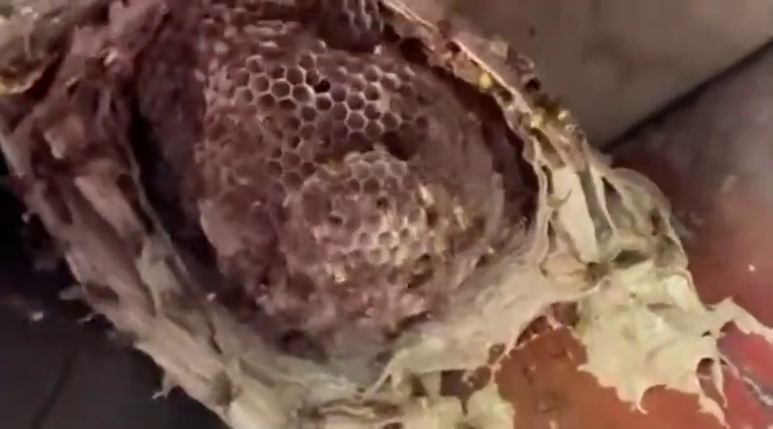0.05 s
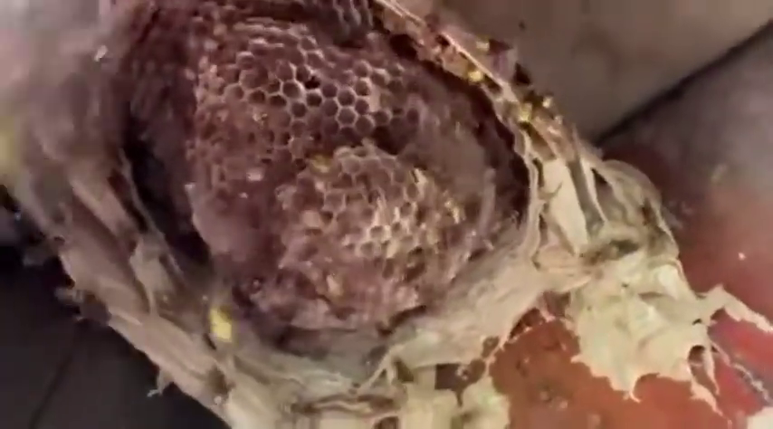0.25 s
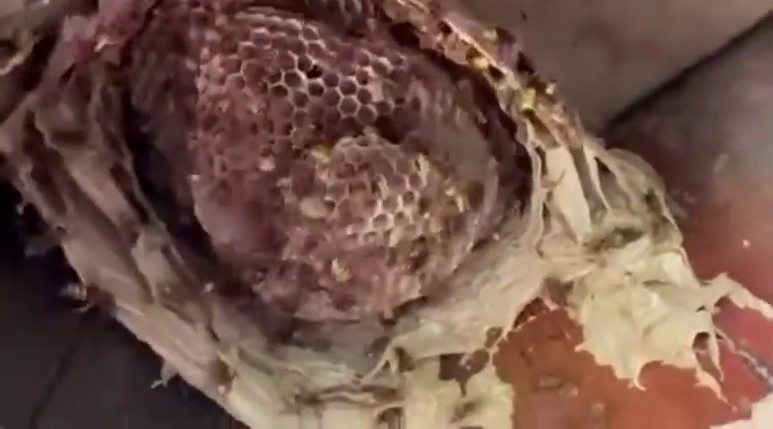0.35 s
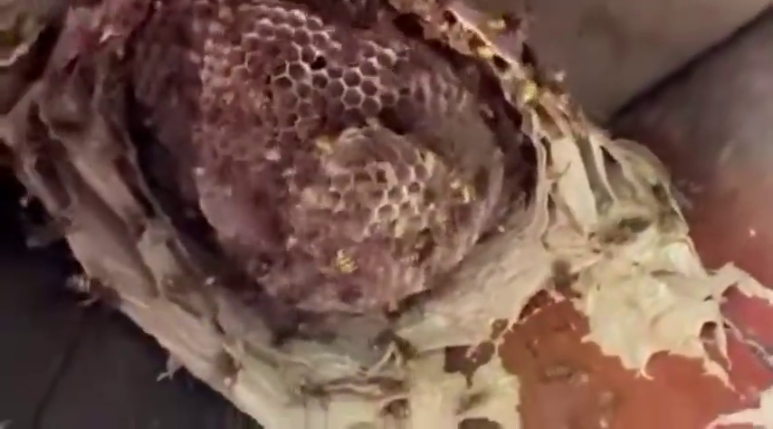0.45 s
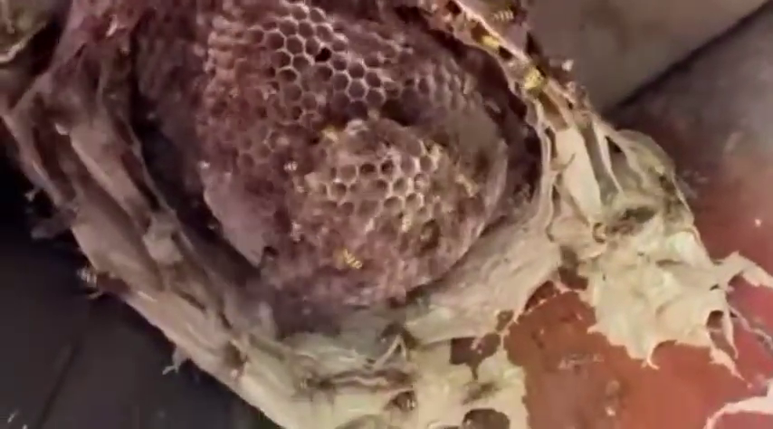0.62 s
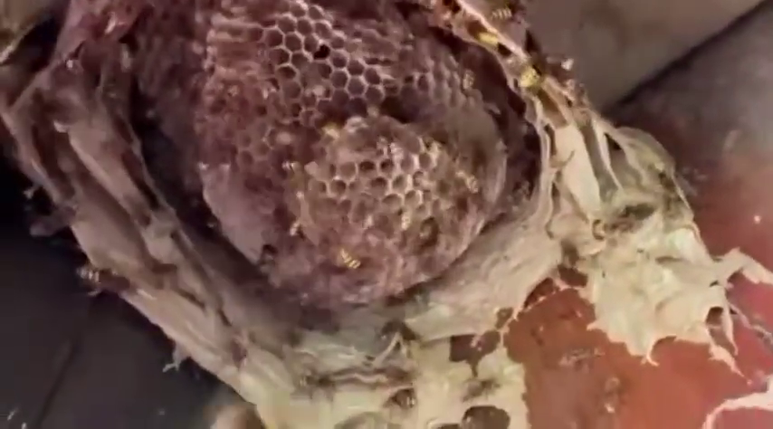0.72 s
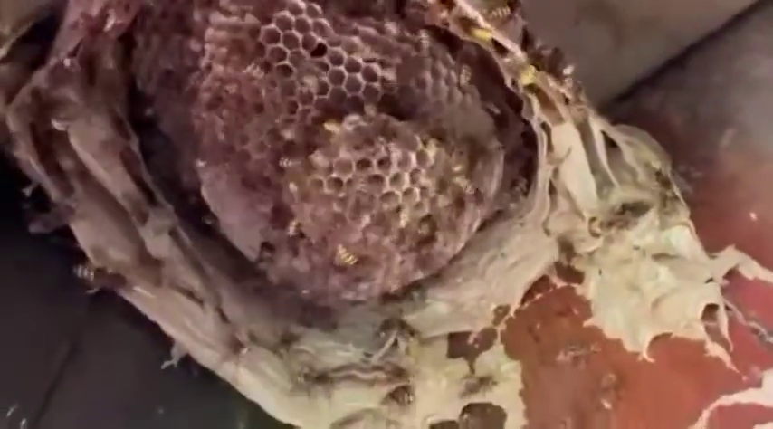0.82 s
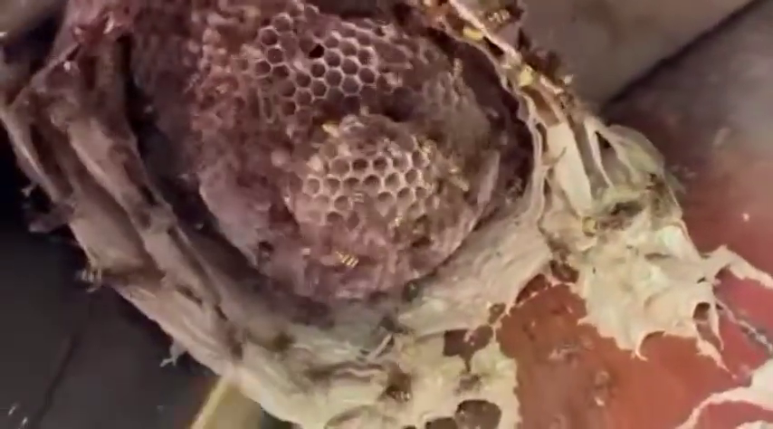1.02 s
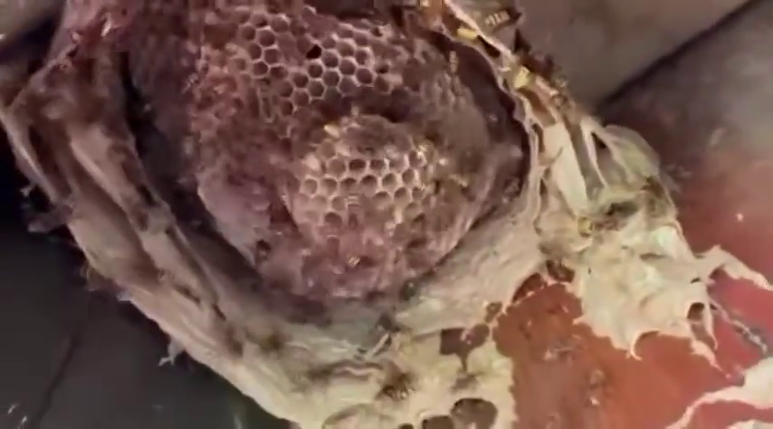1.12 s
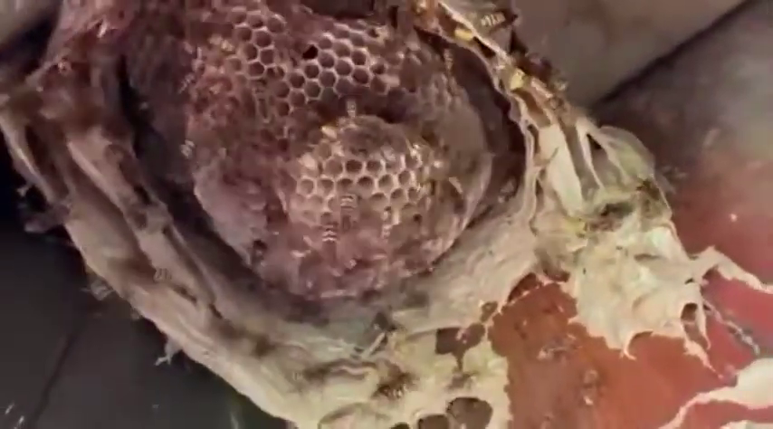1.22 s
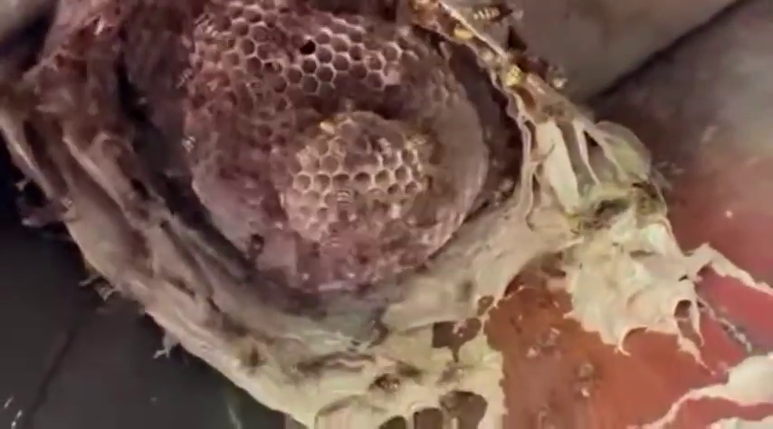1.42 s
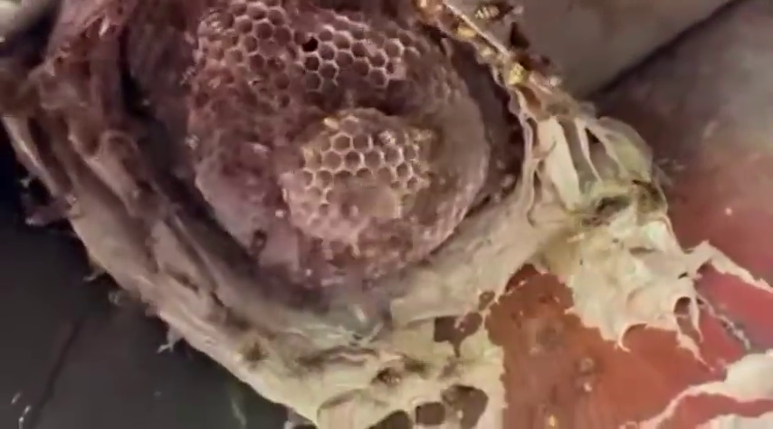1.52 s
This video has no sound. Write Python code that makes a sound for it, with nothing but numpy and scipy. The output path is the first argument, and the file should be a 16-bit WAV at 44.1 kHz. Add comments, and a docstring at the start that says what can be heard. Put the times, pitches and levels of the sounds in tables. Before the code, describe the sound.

Hornets buzz at an opened paper nest outdoors. One flies right up to the microphone, its wings buffeting it with low puffs, then leaves. Others pass farther off while legs scratch and tick on the comb over a steady hiss.

```python
"""Outdoors at an opened paper nest of hornets, on a stereo pair of microphones.
From the start the colony drones over a steady hiss, a few hornets pass farther off, and legs and jaws
scratch and tick on the paper comb. At 0.2 s one flies right up to the microphones, buzzes there for
half a second and buffets them with the wash of its wings. From 0.9 s the distant passes return,
and the drone and the scratching build again toward the end."""
import sys
import numpy as np
from scipy import signal
from scipy.fft import rfft, irfft
from scipy.io import wavfile
from scipy.ndimage import uniform_filter1d

SR = 44100
rng = np.random.default_rng(int(sys.argv[2]) if len(sys.argv) > 2 else 0)


def store_pcm(level_fs):
    """Save levels as 16-bit WAV."""
    pcm = np.round(np.clip(level_fs, -1, 1) * 32767).astype(np.int16)
    wavfile.write(sys.argv[1], SR, np.atleast_2d(pcm).T)


N = 68355
T, HZ = np.arange(N) / SR, np.fft.rfftfreq(N, 1 / SR)

# open-air hiss (frequency [Hz], relative level [dB])
AIR_SPECTRUM = [(20, 3), (50, 37), (100, -45), (300, 21), (1000, 27), (2000, 0), (4000, 3), (7000, -6),
                (9200, 6.5), (10300, -20), (11500, 21.5), (13000, -51)]
# likeness of the hiss at the two microphones (frequency [Hz], correlation [clipped to -1..1])
AIR_LIKENESS = [(50, 0.62), (300, -0.21), (1000, -0.41), (2500, -0.079), (5000, 0.65), (8000, 0.13),
                (10300, 0.78), (11300, -1.2)]
# drone of the whole colony (time [s], level [dB])
DRONE_LEVEL = [(0, -55), (.1, -46), (.2, -43), (.3, -43), (.6, -43), (.81, -41), (.9, -51.5), (1.1, -50),
               (1.28, -47), (1.34, -45.5), (1.42, -40), (1.55, -43)]
# its colour (frequency [Hz], relative level [dB])
DRONE_SPECTRUM = [(30, -41), (90, -2), (130, 6.5), (200, -9.5), (270, 0), (420, -1.5), (650, -2.5),
                  (1000, -8), (1600, -27), (3000, -24), (8000, -79)]
# handling rumble and stirred air (time [s], level [dB])
RUMBLE_LEVEL = [(0, -51), (.05, -42.5), (.125, -52), (.17, -68), (.22, -44), (.26, -28.5), (.62, -37),
                (.7, -53), (.76, -55.5), (.81, -43), (.88, -70), (1.2, -81), (1.3, -50), (1.55, -83)]
# its colour (frequency [Hz], relative level [dB])
RUMBLE_SPECTRUM = [(15, -7), (30, -7), (50, 5), (90, -11), (180, -4), (400, -2.5), (1500, -87)]
# dry crackle of the comb (time [s], level [dB])
CRACKLE_LEVEL = [(0, -53), (.042, -46.5), (.07, -57), (.1, -51.5), (.13, -56), (.22, -53.5), (.252, -47.5),
                 (.28, -53), (.345, -56), (.38, -48), (.42, -54.5), (.46, -51), (.515, -57), (.545, -50),
                 (.59, -54.5), (.76, -53), (.82, -45.5), (.86, -48.5), (1.05, -54), (1.095, -49),
                 (1.13, -55.5), (1.2, -49), (1.28, -49.5), (1.34, -51), (1.39, -47.5), (1.43, -47.5),
                 (1.47, -43.5), (1.51, -49), (1.55, -44.5)]
# colour of the paper (frequency [Hz], relative level [dB])
PAPER_SPECTRUM = [(300, -91), (1000, 5.5), (2000, 2.5), (3500, -0.5), (5000, 0.5), (7000, 1), (9000, 3.5),
                  (10300, -8.5), (11500, -1), (13000, -15)]
# single bright scrapes across the paper (time [s], half-length [s], level [dB])
SCRAPES = [(0.692, 0.03, -51), (0.77, 0.026, -55), (0.9, 0.023, -45), (1.01, 0.065, -53.5),
           (1.291, 0.015, -43.5)]
# their colour (frequency [Hz], relative level [dB])
SCRAPE_SPECTRUM = [(1000, -2), (3600, -6), (5000, -1), (6700, 4.5), (9000, -2.5), (10300, -13),
                   (11500, -32), (13000, -2)]
# hornets farther off (time when closest [s], half-length [s], wingbeat [Hz], wingbeat level [dB],
# octave re wingbeat [dB], overtones re wingbeat [dB], favoured overtone [Hz], left microphone lead [ms])
FAR_PASSES = [(0.026, 0.022, 124, -60.5, 18, 11, 372, 1), (0.09, 0.024, 138, -57.5, 15.5, 14.5, 436, -0.42),
              (0.129, 0.0089, 156, -42.5, 2.5, -8, 410, 0.76),
              (0.15, 0.017, 120, -51.5, 11, -4, 385, -0.66), (0.907, 0.032, 131, -54.5, 4.5, 1, 410, 0.012),
              (0.973, .016, 140, -51, -4, -8, 635, -0.21),
              (1.056, 0.034, 128, -52.5, -14.5, 0.5, 380, -0.27),
              (1.114, .018, 142, -54.5, 1, -7, 610, 0.32), (1.157, 0.013, 131, -44.5, -11, -7, 656, 0.39),
              (1.202, 0.012, 127, -53.5, 4, 8.5, 375, 0.21), (1.25, 0.015, 123, -55, 6.5, 9.5, 370, -0.11),
              (1.284, 0.01, 125, -38.5, -2.5, 0.5, 507, 0.14),
              (1.394, 0.024, 116, -42.5, -9, -3, 620, -0.15), (1.457, 0.016, 116, -58, -4, 7, 610, -0.4),
              (1.518, 0.026, 114, -55, 0, 4, 650, 0.002)]
# their overtones (frequency [Hz], relative level [dB])
FAR_SPECTRUM = [(380, 1), (500, 0), (640, 0.5), (800, -15), (1050, -5), (1500, -29), (3000, -18),
                (5000, -46)]
# ticks of the paper (time [s], level [dB], left over right [dB], added tilt [dB per octave])
PAPER_TICKS = [(0.041, -40.5, 2, 5.5), (.0955, -33.5, -1, 9), (0.2442, -25.5, -2.5, -2),
               (.2538, -33.5, -7, -1), (0.399, -41, 3, -1), (0.406, -34, 2, 2), (0.4137, -42, -5, -1),
               (.4182, -37, -3, 7), (0.4193, -33.5, -7, 1.5), (0.4281, -35.5, 8, -5),
               (0.435, -36.5, -3, -3), (0.7903, -39, -11, 4), (0.8151, -37, -2, 0), (0.8208, -36, -4, -3),
               (0.8675, -39, -1, 3), (1.0842, -37, 0, 0.5), (1.2425, -31, -1.5, 2), (1.2503, -36, -3, 1),
               (1.3725, -37.5, -8, 4)]
# near hornet's pitch (time [s], wingbeat [Hz])
NEAR_WINGBEAT = [(.18, 151), (.238, 151), (.3, 144.5), (.335, 148.3), (.368, 148), (.4, 145), (.46, 144),
                 (.49, 147.5), (.566, 149), (.63, 146), (.7, 142.5), (.8, 142)]
# its loudness (time [s], wingbeat level [dB], octave level [dB], overtone level [dB])
NEAR_LEVELS = [(.16, -65, -62, -64), (.2, -37, -37, -42), (.222, -47, -33, -44), (.245, -30, -22, -28.5),
               (.285, -34, -26.5, -43), (.312, -44, -34, -40), (.345, -28, -25, -36),
               (.375, -43.5, -28.5, -45), (.415, -26.5, -26.5, -41.5), (.447, -67, -34.5, -43.5),
               (.468, -24.5, -21.5, -38), (.52, -26.5, -28.5, -36.5), (.565, -20.5, -24, -34.5),
               (.59, -37.5, -29, -41), (.655, -27, -39.5, -41), (.68, -37, -21.5, -33.5),
               (.702, -22.5, -14, -28.5), (.726, -48, -46, -50), (.775, -52, -36.5, -40.5),
               (.84, -68, -63, -81)]
# its overtones (frequency [Hz], relative level [dB])
NEAR_SPECTRUM = [(430, 1), (590, -4), (740, -4.5), (890, -14.5), (1040, -15.5), (1200, -15), (1500, -19.5),
                 (2500, -31), (5000, -44)]
# its bearing (time [s], left microphone lead [ms], left over right [dB])
NEAR_DIRECTION = [(.2, -0.45, 0.5), (.25, 0.062, -2.5), (.29, 0.0018, 5.5), (.33, -0.073, -2),
                  (.38, 0.075, 5), (.43, 0.11, 0.5), (.47, -0.15, -0.5), (.55, 0.041, 2),
                  (.63, 0.047, -0.5), (.68, 0.39, -3.5), (.71, 0.45, 1), (.79, 0.48, -0.5)]
# its heading favours one overtone (time [s], favoured overtone [Hz])
NEAR_HEADING = [(.2, 730), (.235, 447), (.3, 430), (.33, 580), (.36, 607), (.39, 425), (.575, 442),
                (.6, 590), (.645, 690), (.67, 557), (.71, 554), (.75, 704)]
# puffs of wing wash on the microphones (time [s], half-length [s], centre [Hz], level [dB])
WASH_PUFFS = [(0.252, .008, 428, -19), (0.258, 0.0076, 189, -14), (0.268, .007, 79, -12),
              (0.293, 0.014, 115.4, -20.5), (0.357, 0.0052, 206, -24.5), (0.384, 0.012, 73, -18.5),
              (0.448, 0.022, 101, -29.5), (.545, 0.041, 105, -20), (0.515, 0.016, 85, -22),
              (0.527, 0.016, 209, -22), (0.572, 0.0076, 118, -16.5), (0.607, 0.016, 56, -23.5),
              (0.645, .021, 51.6, -44), (.812, 0.0074, 97, -40.5)]


def amp(db):
    """Decibels to gain."""
    return 10 ** (np.asarray(db) / 20)


def unit(x):
    """Scales to rms 1."""
    return x / np.sqrt(np.mean(x ** 2) + 1e-20)


def curve(points, column=1):
    """One column of a time table at every sample."""
    table = np.transpose(points)
    return np.interp(T, table[0], table[column])


def read(points, hz):
    """A spectrum read on a log-frequency axis."""
    f, value = np.transpose(points)
    return np.interp(np.log(hz + 1), np.log(f), value)


def colour(x, spectrum):
    """Filters by a spectrum of unit mean power."""
    return irfft(rfft(x) * unit(amp(read(spectrum, HZ))), N)


def pan(db):
    """Gains at the two microphones, the left one higher by db."""
    return amp(np.array([[.5], [-.5]]) * db)


def wander(rate_hz):
    """A smooth random drift of rms 1."""
    return unit(irfft(rfft(rng.standard_normal(N)) * np.exp(-(HZ / rate_hz) ** 2), N))


def pair(x, likeness):
    """Makes two unrelated signals partly alike, as at a pair of microphones."""
    left, other = rfft(x)
    likeness = np.clip(likeness, -1, 1)
    return irfft(np.array([left, likeness * left + np.sqrt(1 - likeness ** 2) * other]), N)


def patchy(x, depth_db=3.5):
    """Shifts the colour of a noise at random from moment to moment."""
    frames = signal.stft(x, nperseg=1024, noverlap=768)[2]
    patches = uniform_filter1d(rng.standard_normal(frames.shape[1:]), size=9, axis=0)
    patches = unit(uniform_filter1d(patches, size=8, axis=1))
    return signal.istft(frames * amp(depth_db * patches), nperseg=1024, noverlap=768)[1][:, :N]


def noise(spectrum, likeness):
    """Coloured stereo noise of rms 1."""
    return unit(colour(pair(patchy(rng.standard_normal((2, N))), likeness), spectrum))


def air_hiss():
    """The steady outdoor hiss behind everything."""
    return amp(-53) * noise(AIR_SPECTRUM, read(AIR_LIKENESS, HZ))


def colony_drone():
    """The wings of the whole colony blur into a low band of noise."""
    return amp(curve(DRONE_LEVEL)) * noise(DRONE_SPECTRUM, likeness=.53)


def handling_rumble():
    """Handling and stirred air rumble almost alike on both microphones."""
    return amp(curve(RUMBLE_LEVEL)) * noise(RUMBLE_SPECTRUM, likeness=.95)


def grains(clicks_per_s=3000, spread_db=4.5, hiss_gain=.94):
    """Dense tiny clicks of legs and jaws on paper, blended with hiss."""
    size = amp(spread_db * np.minimum(rng.exponential(1, (2, N)), 4))
    clicks = unit(size * rng.choice([-1, 1], (2, N)) * (rng.random((2, N)) < clicks_per_s / SR))
    return unit(patchy(clicks + hiss_gain * rng.standard_normal((2, N))))


def scratching():
    """Hornets crawl on the comb: a dry crackle near the centre, brighter scrapes to the right."""
    crackle = amp(curve(CRACKLE_LEVEL)) * colour(pair(grains(), likeness=.4), PAPER_SPECTRUM)
    strokes = sum(amp(db) * np.exp(-.5 * ((T - s) / half_s) ** 2) for s, half_s, db in SCRAPES)
    scrapes = strokes * colour(pair(grains(), likeness=.12), SCRAPE_SPECTRUM)
    return pan(db=-1) * crackle + pan(db=-11) * scrapes


def wings(hz, lead_ms, levels_db, spectrum, lobe_hz, lobe_db, jitter, flutter_db, roughness):
    """Uneven wingbeats: a tone, its octave and overtones that flutter as the insect turns."""
    beats = np.cumsum(hz * (1 + jitter * wander(rate_hz=99.2))) / SR
    beats = beats + np.array([[.5], [-.5]]) * hz * lead_ms / 1000  # one microphone hears it first
    harmonics = [np.sqrt(2) * np.cos(2 * np.pi * (k * beats + rng.random())) for k in range(1, 31)]
    overtones, lobe_width_oct = 0, .13
    for k, harmonic in enumerate(harmonics[2:], start=3):
        overtone_hz = k * hz.mean()
        lift_db = lobe_db * np.exp(-.5 * (np.log2(overtone_hz / lobe_hz) / lobe_width_oct) ** 2)
        db = read(spectrum, overtone_hz) + lift_db + flutter_db * wander(rate_hz=27)
        overtones += amp(db) * harmonic
    overtones = unit(overtones * (1 + roughness * wander(rate_hz=98)))
    beat_db, octave_db, overtone_db = levels_db
    return amp(beat_db) * harmonics[0] + amp(octave_db) * harmonics[1] + amp(overtone_db) * overtones


def far_hornets(doppler=.02, beat_sway_db=3.5, sway_db=2.5):
    """Flying past farther off, each swells, drops in pitch and fades; its heading favours one overtone."""
    out = np.zeros((2, N))
    for s, half_s, hz, db, octave_db, overtone_db, lobe_hz, lead_ms in FAR_PASSES:
        along = (T - s) / half_s
        pitch_hz = hz * (1 - doppler * np.tanh(along))
        levels_db = db + beat_sway_db * wander(rate_hz=38), db + octave_db, db + overtone_db
        buzz = wings(pitch_hz, lead_ms, levels_db, FAR_SPECTRUM, lobe_hz,
                     lobe_db=7, jitter=.04, flutter_db=4.5, roughness=.18)
        out += buzz * amp(sway_db * wander(rate_hz=6.4)) / np.cosh(np.clip(along, -20, 20))
    return out


def reflections(x, t60_s=.12, gap_s=.003):
    """Short echoes from the surfaces around the nest."""
    tail = rng.standard_normal((2, N)) * amp(-60 * T / t60_s) * (T > gap_s)
    return signal.fftconvolve(x, tail / np.linalg.norm(tail[0]), axes=1)[:, :N]


def paper_ticks(rise_s=.00059, decay_s=.00096, tail_s=.0069, tail_db=-15.5):
    """Fibres of the comb snap, thin ones brighter, each with a brief crumbling tail."""
    out = np.zeros((2, N))
    for s, db, side_db, tilt_db in PAPER_TICKS:
        age = np.maximum(T - s, 0)
        decay = np.exp(-age / decay_s) + amp(tail_db) * np.exp(-age / tail_s)
        envelope = np.minimum(age / rise_s, 1) * decay
        tilted = [(hz, level + tilt_db * np.log2(hz / 300)) for hz, level in PAPER_SPECTRUM]
        snap = colour(pair(rng.standard_normal((2, N)), likeness=.7), tilted)
        out += pan(side_db) * amp(db) * envelope * snap
    return out


def near_hornet():
    """One hovers right at the microphones and crosses them; its tone changes as it turns."""
    levels_db = [curve(NEAR_LEVELS, column) for column in (1, 2, 3)]
    lead_ms, side_db = curve(NEAR_DIRECTION, 1), curve(NEAR_DIRECTION, 2)
    buzz = wings(curve(NEAR_WINGBEAT), lead_ms, levels_db, NEAR_SPECTRUM, curve(NEAR_HEADING),
                 lobe_db=5.5, jitter=.014, flutter_db=2, roughness=.3)
    return pan(side_db) * buzz


def wing_wash(width_oct=.42, skirt_db=-28):
    """At close range, short swirls of air from the wings push on both microphones alike."""
    out = np.zeros((2, N))
    for s, half_s, hz, db in WASH_PUFFS:
        window = np.exp(-.5 * ((T - s) / half_s) ** 2)
        widths_off = np.log2((HZ + 1) / hz) / width_oct
        band = np.exp(-.5 * widths_off ** 2) + amp(skirt_db) / (1 + widths_off ** 2) ** 2
        gust = window * pair(rng.standard_normal((2, N)), likeness=1)
        swirl = window * irfft(rfft(gust) * band, N)
        out += amp(db) * unit(swirl) * np.sqrt(np.mean(window ** 2))
    return out


def scene():
    """Hornets, comb and background at the microphones; the far hornets carry more echo."""
    near, far = near_hornet(), far_hornets()
    background = colony_drone() + handling_rumble() + air_hiss()
    echoes = reflections(amp(-2) * far + amp(-19) * near)
    return background + far + near + echoes + wing_wash() + scratching() + paper_ticks()


def record(dry, low_cut_hz=24, top_hz=12100):
    """The recorder's low cut and band limit."""
    dry = irfft(rfft(dry) * HZ ** 4 / np.hypot(HZ ** 4, low_cut_hz ** 4), N)
    lowpass = signal.firwin(301, top_hz, window=("kaiser", 9), fs=SR)
    return signal.oaconvolve(dry, lowpass[None], "same")


dry = scene()
out = record(dry)
store_pcm(out)
```